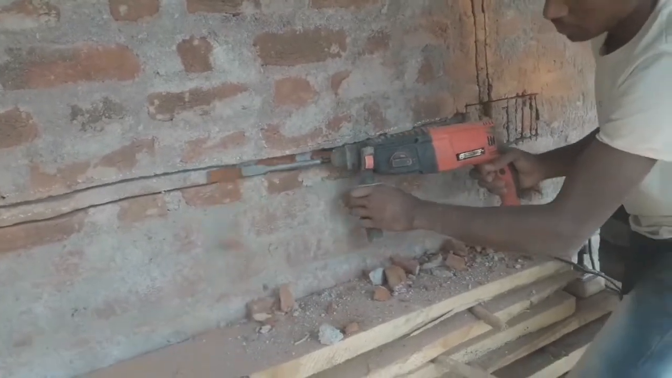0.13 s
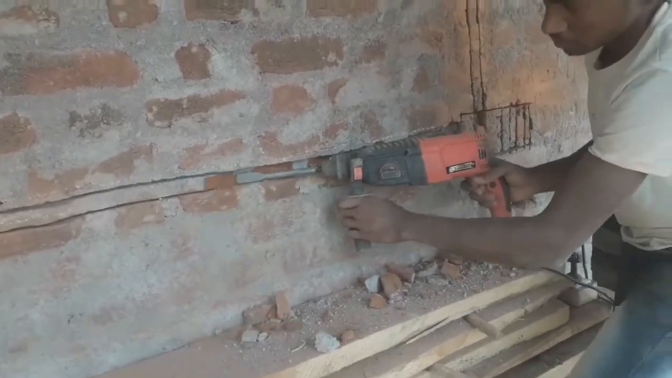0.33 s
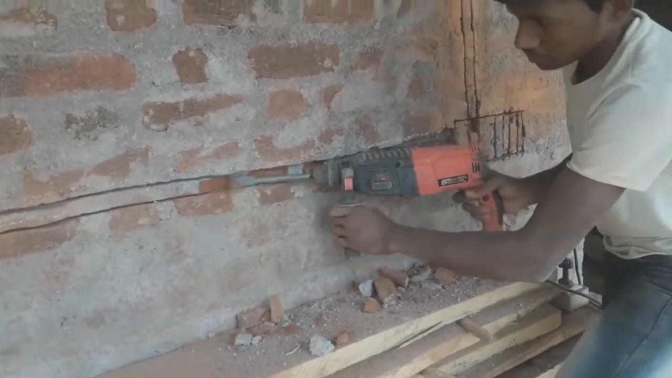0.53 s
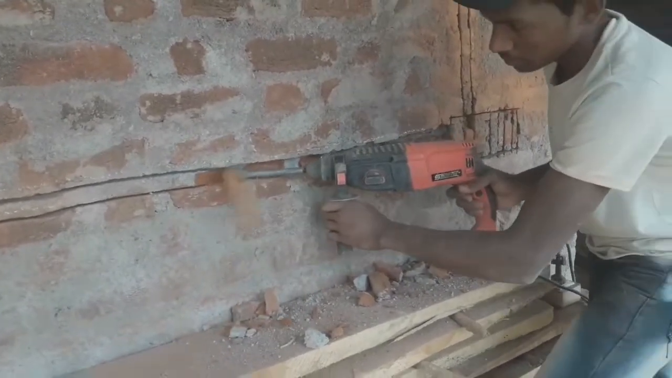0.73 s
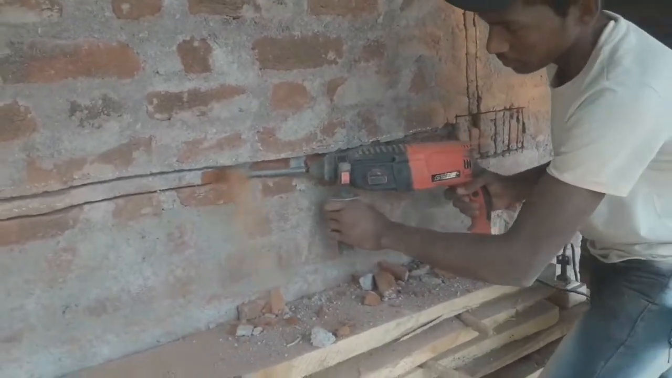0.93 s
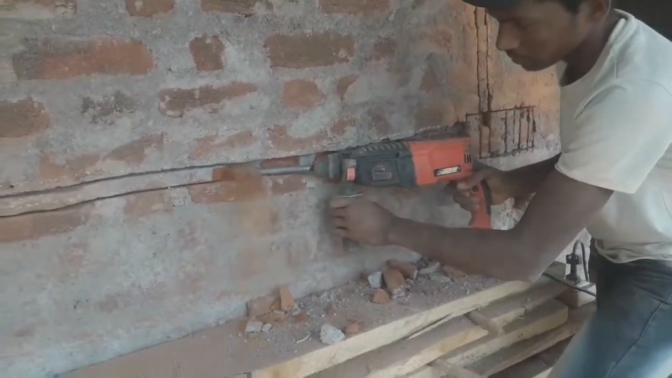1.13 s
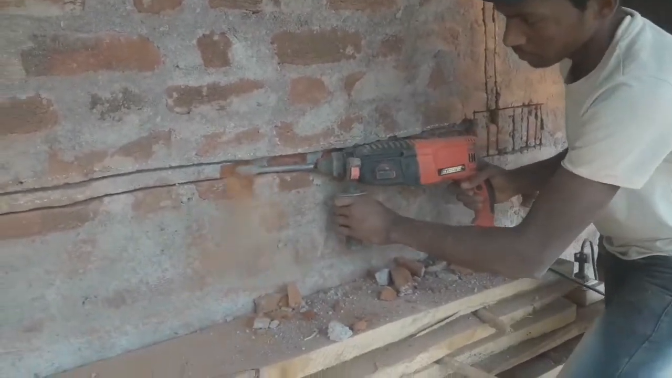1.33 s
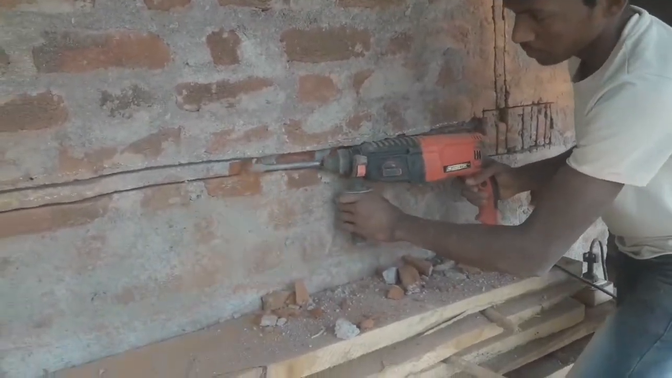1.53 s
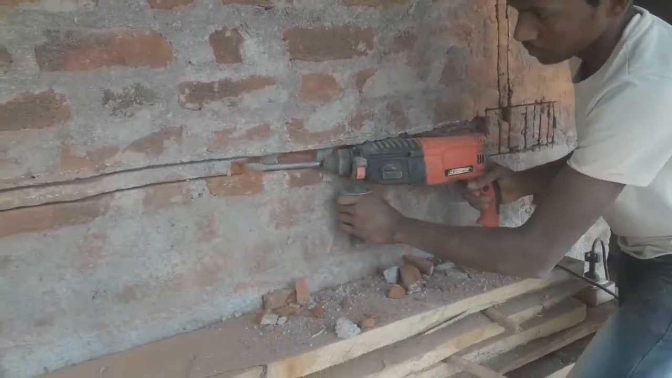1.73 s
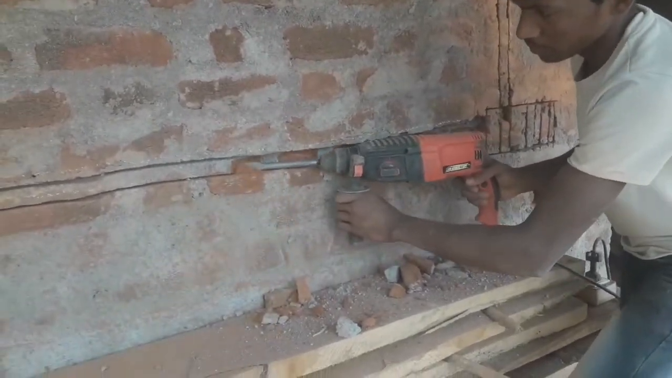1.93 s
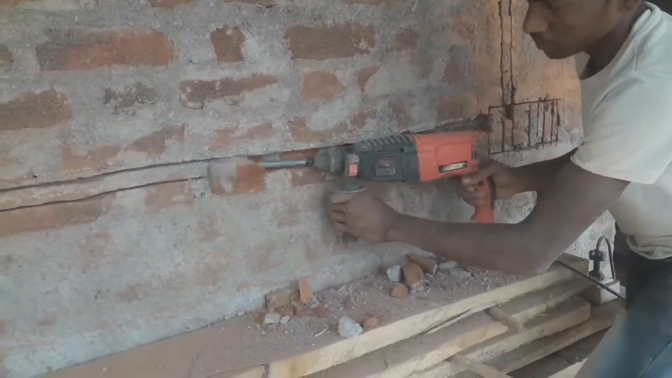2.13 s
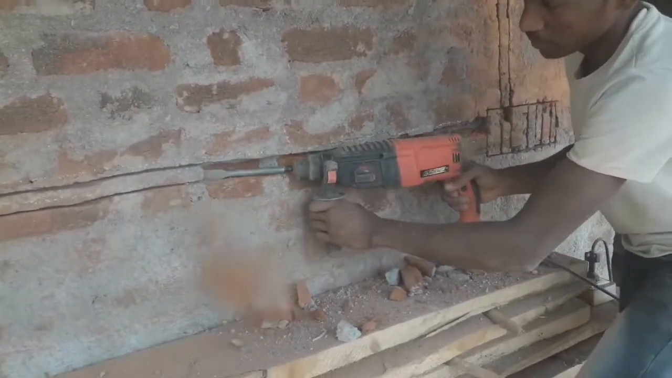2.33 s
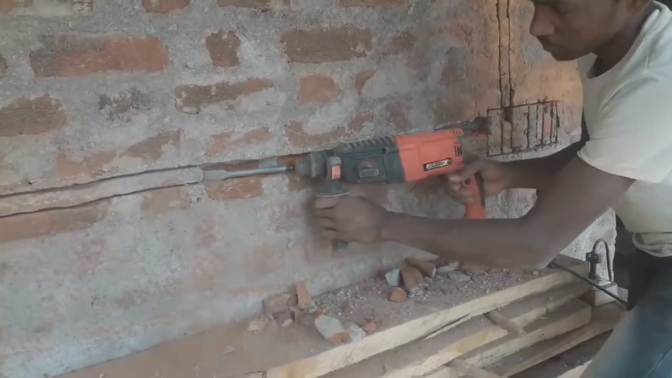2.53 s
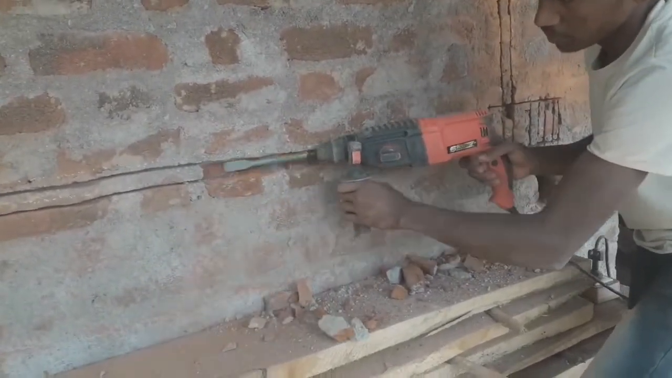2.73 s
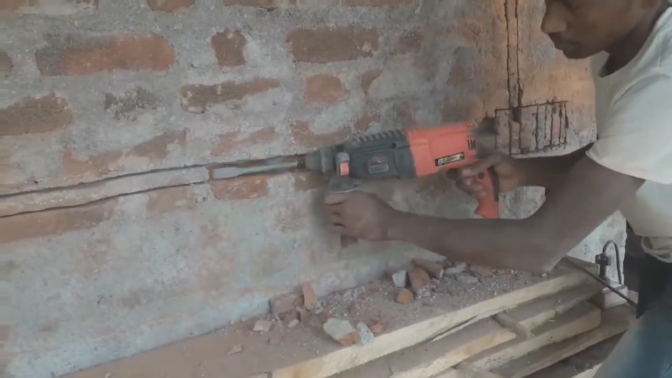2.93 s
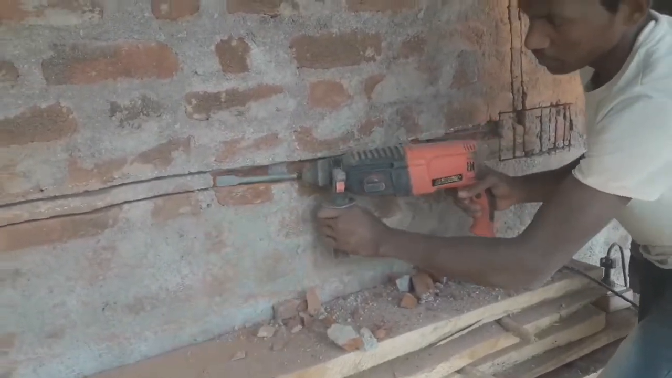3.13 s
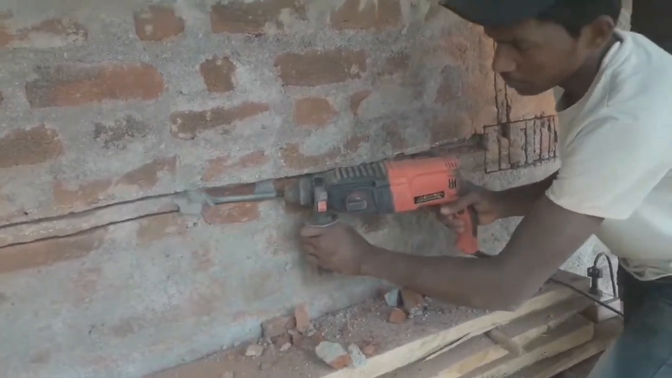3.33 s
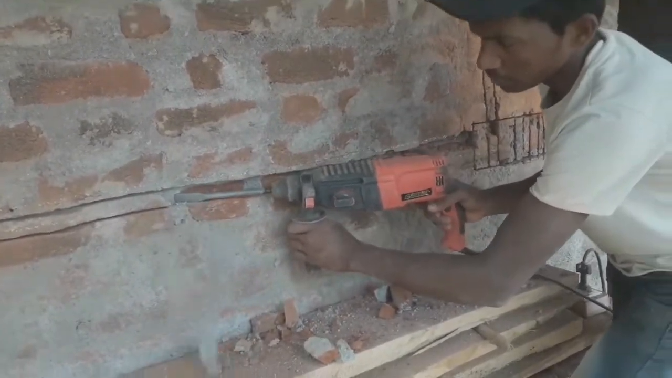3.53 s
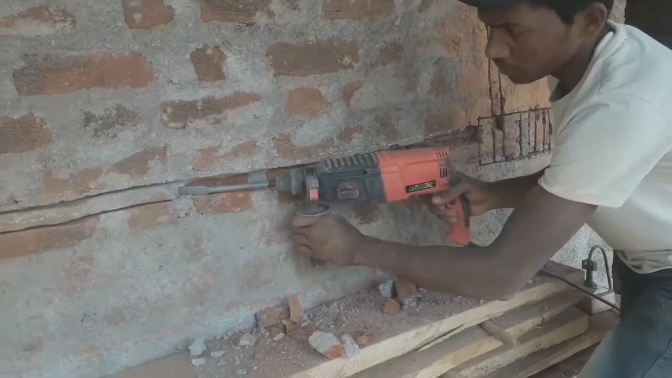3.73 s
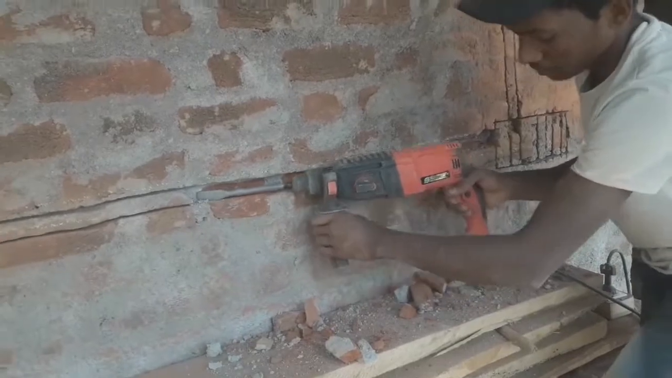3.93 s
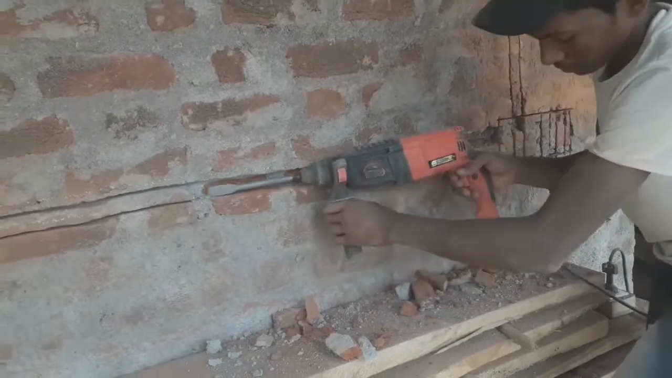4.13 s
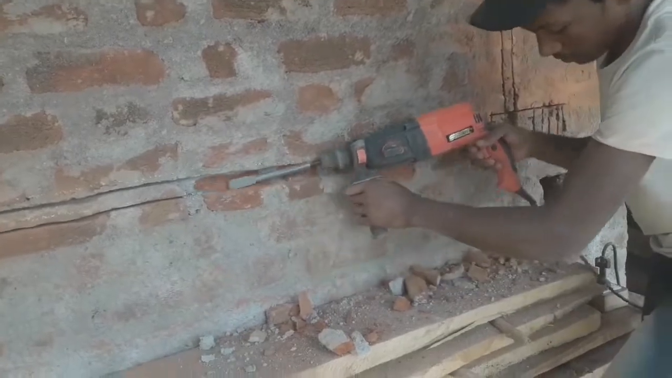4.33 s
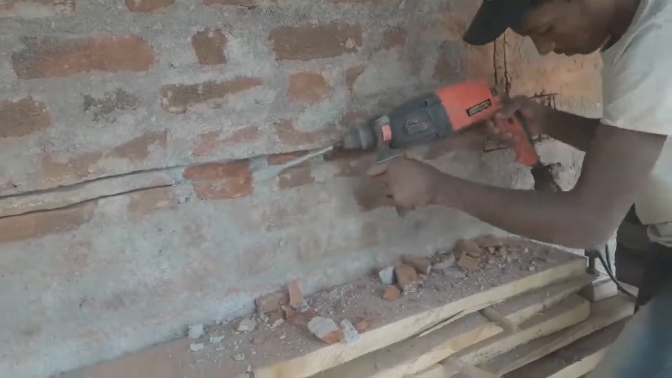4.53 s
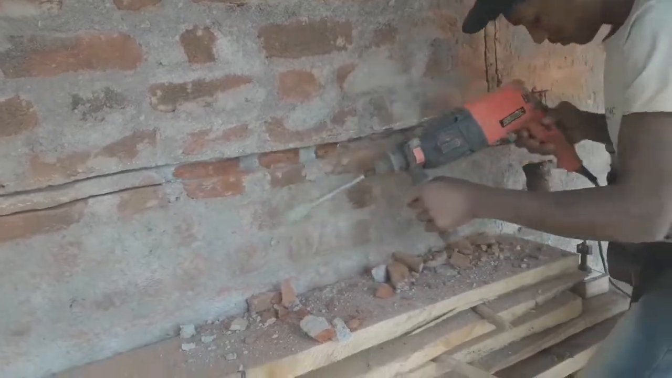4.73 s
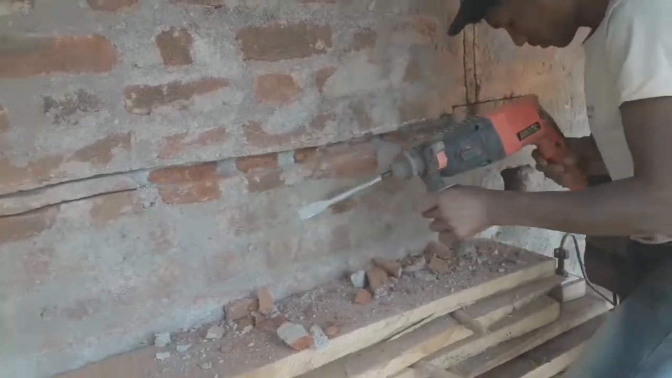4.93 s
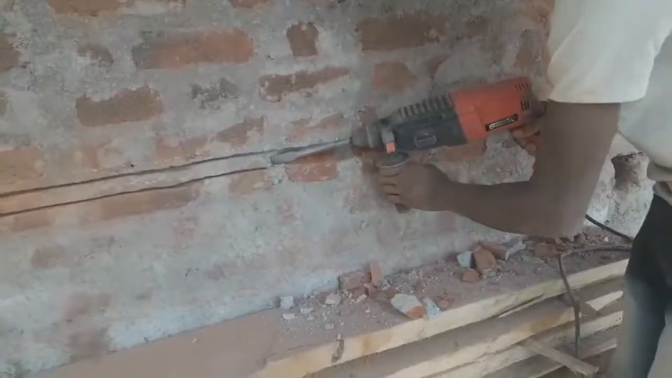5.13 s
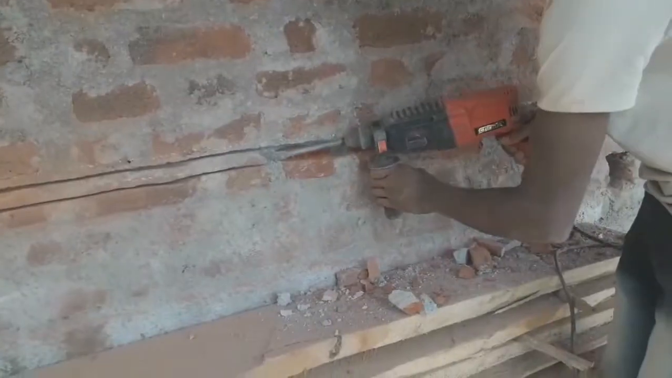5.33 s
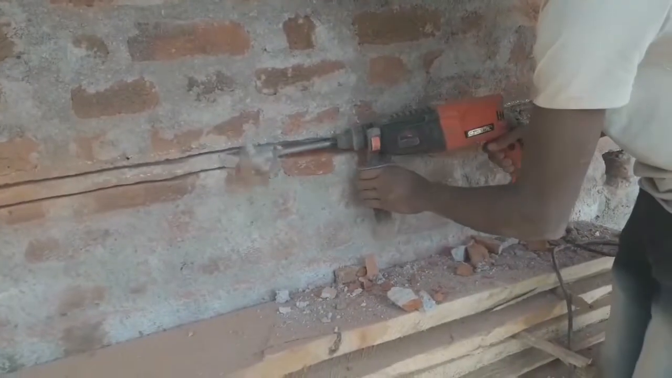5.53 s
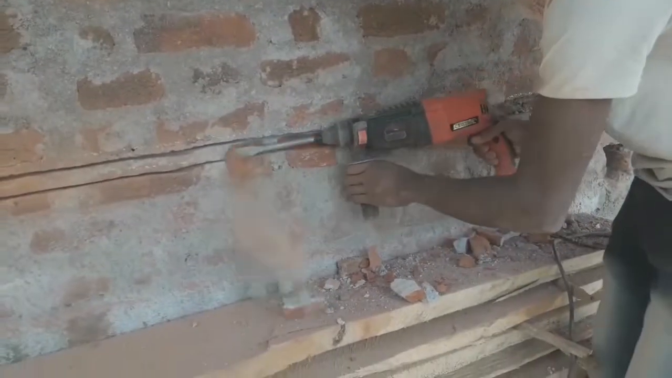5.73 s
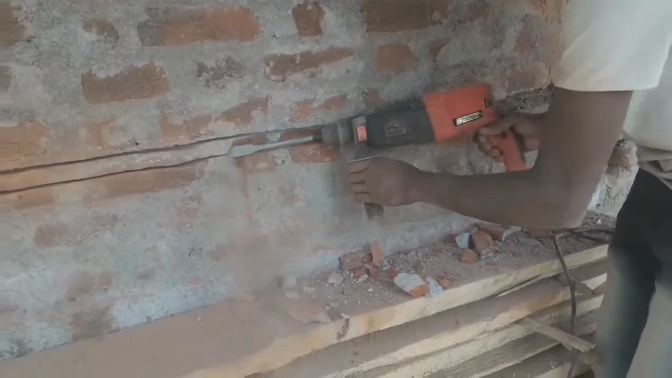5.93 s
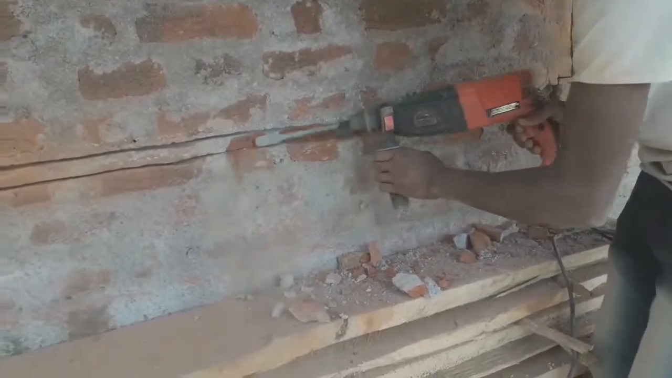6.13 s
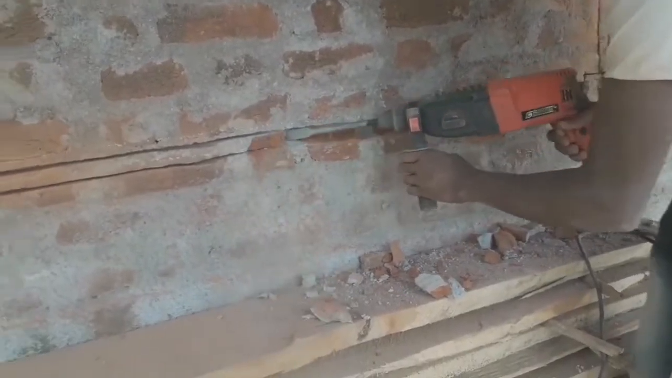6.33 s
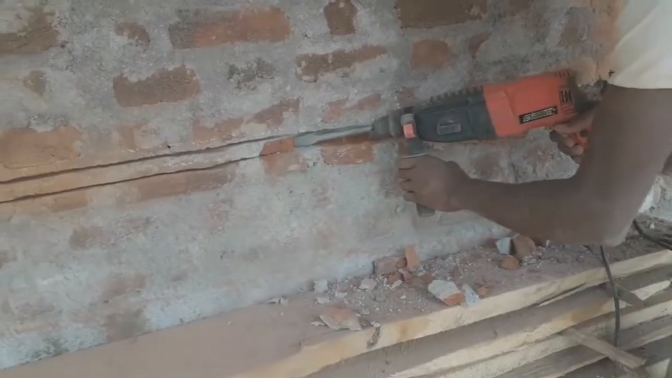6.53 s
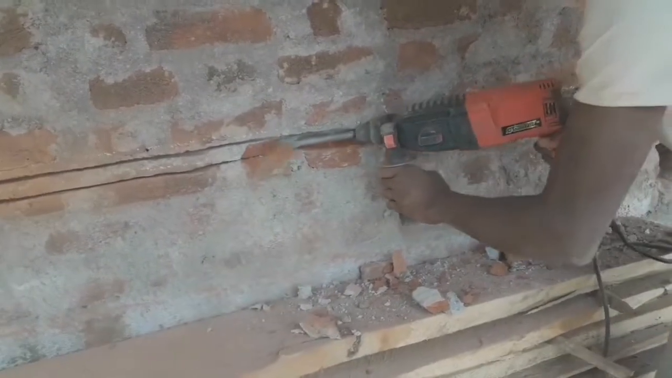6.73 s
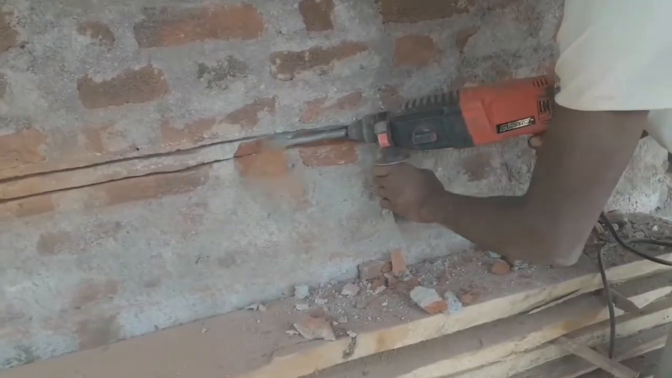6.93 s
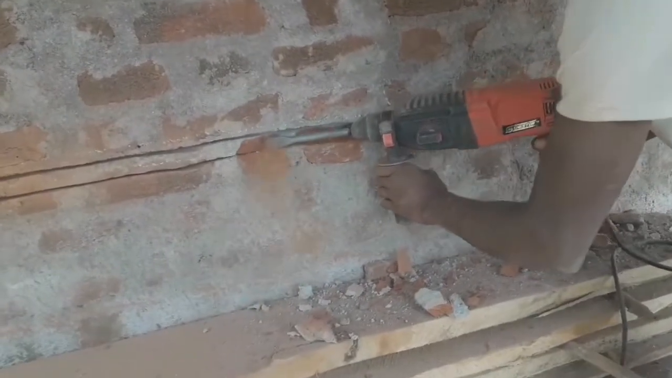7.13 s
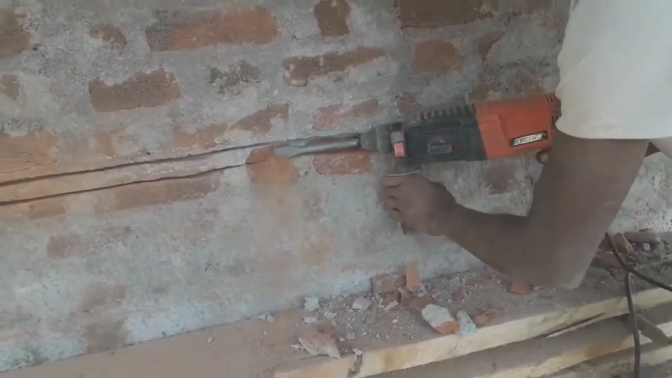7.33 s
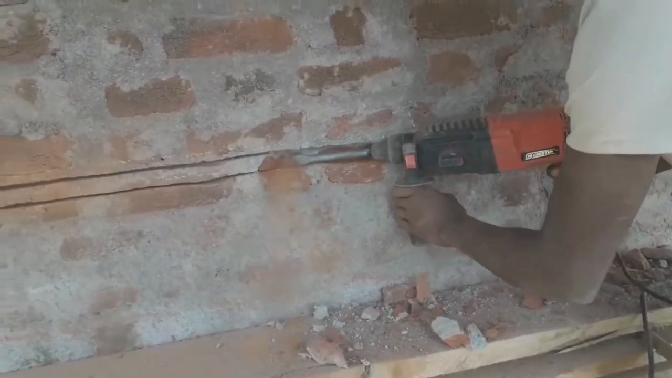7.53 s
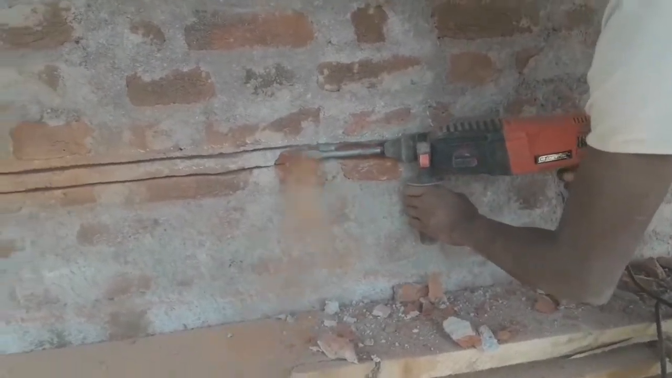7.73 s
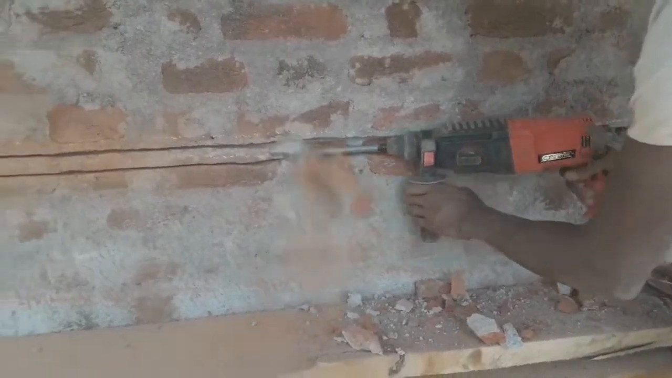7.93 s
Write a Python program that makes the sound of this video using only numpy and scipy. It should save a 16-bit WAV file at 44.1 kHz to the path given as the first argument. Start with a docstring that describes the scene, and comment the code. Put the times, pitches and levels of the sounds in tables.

```python
"""In a bare room a rotary hammer chisels a channel into a plastered brick wall.
The first of six trigger pulls is already under way and five follow: each drives the motor, then it coasts.
Each piston stroke is a noise crack with a ringing housing, a wall boom and a room tail, plus damped resonances.
A seated chisel repeats its blows closely and buzzes; a loose one rattles and sings in decaying tones.
Plaster patters down throughout as coloured pulses; the heaviest chips land in the last two pulls."""
import sys
import numpy as np
from scipy import signal
from scipy.fft import rfft, irfft, next_fast_len
from scipy.io import wavfile
from scipy.ndimage import uniform_filter1d, map_coordinates

SR = 44100
rng = np.random.default_rng(int(sys.argv[2]) if len(sys.argv) > 2 else 0)


def wrap_up_sound(samples):
    """Save the sound to the file named by the first command line argument, as 16-bit audio."""
    columns = np.atleast_2d(samples).T
    # keep every value between -1 and 1, then stretch to whole-number steps
    tamed = np.clip(columns, -1, 1)
    steps = np.round(tamed * 32767).astype(np.int16)
    wavfile.write(sys.argv[1], SR, steps)


N = 351477

WORKING_RATE = 68  # blows per second
FREE_BOOM_DB = -58  # wall boom at the working rate with the tool running free, before trims


def amp(db):
    """Decibels to gain."""
    return 10 ** (np.asarray(db) / 20)


def unit(x):
    """Scale to rms 1."""
    return x / np.sqrt(np.mean(x ** 2) + 1e-20)


def curves(rows):
    """One value per sample for each column after the time."""
    seconds, *columns = np.transpose(rows)
    return [np.interp(np.arange(N) / SR, seconds, column) for column in columns]


def convolve(x, response):
    """x heard through a response."""
    return signal.fftconvolve(x, response)[:N]


def colour(x, points):
    """Causal minimum-phase filter, its gain drawn through (Hz, dB) points."""
    size = 8192
    hz, db = np.transpose(points)
    bins_hz = np.fft.rfftfreq(size, 1 / SR)
    gain = amp(np.interp(np.log(bins_hz + 1), np.log(hz), db))
    # folding the cepstrum onto positive time makes the filter causal
    cepstrum = irfft(np.log(gain))
    cepstrum[1:size // 2] *= 2
    cepstrum[size // 2 + 1:] = 0
    return convolve(x, irfft(np.exp(rfft(cepstrum))))


def tinted(x, points):
    """Colour a white sound and keep its power."""
    impulse = signal.unit_impulse(N)
    return colour(x, points) / np.linalg.norm(colour(impulse, points))


def pulses(times, sizes):
    """Impulses that may fall between samples, as windowed sincs."""
    at = np.clip(times * SR, 0, N)[:, None]
    taps = np.floor(at).astype(int) + np.arange(-7, 9)
    shape = np.sinc(taps - at) * np.cos(np.pi * (taps - at) / 16) ** 2
    weights = sizes[:, None] * shape
    return np.bincount(np.clip(taps, 0, N).ravel(), weights.ravel(), N + 1)[:N]


def even(response):
    """A response of unit energy with its broad colour taken out and its fine peaks kept."""
    spectrum = rfft(response)
    broad_power = np.abs(uniform_filter1d(np.abs(spectrum) ** 2, size=200))
    return irfft(spectrum / np.sqrt(broad_power + 1e-12))


def resonate(blows, modes):
    """Blows through damped (Hz, width Hz, dB) resonances, wider ones dying sooner; rms 1."""
    t = np.arange(SR // 4) / SR
    response = np.zeros(len(t))
    for hz, width, db in modes:
        decay = np.exp(-np.pi * width * t)
        response += amp(db) * np.sqrt(width) * decay * np.sin(2 * np.pi * hz * t)
    return unit(convolve(pulses(*blows), response))


def motor_speed():
    """Blows per second: a pull drives the motor, fast and then settling; released, it coasts down exponentially."""
    # Each row: pressed in seconds, released in seconds, top speed in blows per second,
    # then time constants of run-up, settling and coasting in seconds.
    pulls = [(0.0, 0.105, 55.08, 0.108, 0.062, 1.028), (0.49, 2.153, 67.85, 0.062, 0.191, 1.241),
             (2.274, 2.501, 78.81, 0.09, 0.51, 1.027), (3.031, 3.928, 81.32, 0.255, 0.182, 0.971),
             (5.133, 5.9, 62.77, 0.127, 0.134, 0.794), (6.514, 7.879, 68.19, 0.065, 0.446, 1.25)]
    settling_share = .12
    now = np.arange(N) / SR
    speed = np.full(N, float(pulls[0][2]))  # already at speed
    for pressed, released, top, run_up, settling, coasting in pulls:
        held = np.clip(now, pressed, released) - pressed
        fast = (1 - settling_share) * np.exp(-held / run_up)
        short = fast + settling_share * np.exp(-held / settling)
        driven = top - (top - np.interp(pressed, now, speed)) * short
        coast = np.exp(-np.maximum(now - released, 0) / coasting)
        speed = np.where(now < pressed, speed, driven * coast)
    return speed


def sway(per_s):
    """A smooth random curve for the unsteady grip, per_s random points a second."""
    points = rng.standard_normal(int(N * per_s / SR) + 4)
    return map_coordinates(points, [np.arange(N) * per_s / SR], order=2)


def blow_levels(speed):
    """dB of housing, steel, edge and boom: blows grow with speed, and change while the chisel meets the wall."""
    # Each row: start in seconds, length in seconds, change of housing, steel, edge and boom in dB.
    contact_spells = [(-.1, .14, 5.5, 6, 15, 10), (0.492, 0.31, 3, 3, 18, 10), (0.797, 1.53, 3, 4, 17.5, 4),
                      (2.818, 0.14, -0.5, 0, 9, -5), (3.244, 0.14, -1, -2, 16, 7.5),
                      (5.169, 0.38, 8, 7.5, 20.5, 14), (5.548, 0.35, 5, 6, 24, 9.5),
                      (5.908, 0.19, 4.5, 5, 20, 5), (6.635, 0.51, 4.2, 5, 20.5, 11),
                      (7.142, 1.2, 4.5, 6.5, 22.5, 19)]
    # housing, steel, edge, boom running free: dB at the working rate, dB per doubling of speed
    free = [(-42, 9.65), (-40.5, 12.9), (-60, 11), (FREE_BOOM_DB, 7.8)]
    lean_s = 0.035  # time to lean in or ease off
    sway_db = (.4, .5, 1.3, 1.5)  # housing, steel, edge, boom
    now = np.arange(N) / SR

    def lean(s):
        return np.clip((now - s) / lean_s + .5, 0, 1)

    doublings = np.log2(speed / WORKING_RATE)
    levels = np.array([db + slope * doublings for db, slope in free])
    for start, length, *gains_db in contact_spells:
        levels += np.outer(gains_db, lean(start) - lean(start + length))
    return levels + np.outer(sway_db, sway(per_s=14))


def motor(speed, seat):
    """The cooling fan, coloured noise, rushes with the speed; the gears whine as a sine under load."""
    # Air noise of the fan. Each row: frequency in Hz, relative level in dB.
    fan = [(24, -37), (40, -26), (449, -18), (522, -9), (704, -9.5), (1450, -1.5), (2110, 6.5),
           (2770, -11.5), (4130, 2.5), (6480, -2), (8310, -21), (10400, -11), (15500, -27)]
    # Gear whine with the chisel fully seated. Each row: time in seconds, level in dB.
    whine_levels = [(.6, -57), (1.0, -44), (1.6, -41.5), (2.1, -44), (2.3, -57), (6.8, -52), (7.4, -48)]
    air = unit(colour(rng.standard_normal(N), fan)) * amp(-51.0) * speed / WORKING_RATE
    teeth = 25  # whine cycles per blow
    whine = np.sin(2 * np.pi * teeth * np.cumsum(speed) / SR)
    return air + whine * amp(curves(whine_levels)[0]) * seat


def showers():
    """(s, dB) of the chips in the showers of loosened plaster, unevenly spaced and sized."""
    # Each row: start in seconds, length in seconds, chips per second, middle level in dB before the landing gain.
    spells = [(.6, 1.1, 14, -53.5), (1.799, 0.19, 15.6, -45), (2.3, 0.29, 14, -54),
              (2.789, 0.14, 60, -43.5), (3.04, .38, 16, -47.5), (7.15, 1.1, 20.3, -43)]
    scatter_db = 3  # either way
    landings = []
    for start, length, rate, db in spells:
        slots = np.arange(0, length, 1 / rate)
        late, size = rng.random((len(slots), 2)).T
        landings += zip(start + slots + late / rate, db + scatter_db * (2 * size - 1))
    return landings


def chips(bite_db):
    """Chips of plaster land with a dull push and crumble briefly; small ones patter while the edge bites."""
    # Big chips landing. Each row: time in seconds, level in dB before the landing gain.
    big_chips = [(0.038, -47), (0.56, -50), (0.777, -43.5), (2.39, -48), (2.86, -40), (3.31, -44),
                 (5.569, -26.5), (7.225, -41), (7.343, -30), (7.433, -37), (7.522, -41), (7.625, -29.5),
                 (7.669, -32)]
    # Dull colour of a landing. Each row: frequency in Hz, gain in dB.
    thump = [(25, -30), (70, 0), (130, 4.5), (250, 0), (500, -10), (1200, -29), (4000, -60)]
    # Knock of a landing chip. Each row: frequency in Hz, gain in dB.
    knock = [(100, -26), (300, -6), (600, 0), (1000, -21), (2500, -20), (8000, -40)]
    knock_db, knock_grows = 38, 1.19  # gain in dB, and dB of knock per dB of landing
    out, t = np.zeros(N + SR), np.arange(SR // 8) / SR
    when, size = rng.random((160, 2)).T
    fall = np.minimum(bite_db[(when * N).astype(int)], -46)
    patter = pulses(when * N / SR, amp(fall + 21.5 + 13.6 * size))
    landings = list(big_chips) + showers()
    for s, db in landings:
        crumble = 0.045 * amp(-60 * t / 0.11) * rng.standard_normal(len(t))
        push = signal.unit_impulse(len(t))
        out[round(s * SR):][:len(t)] += amp(db + 36.5) * (crumble - push)
    # the harder a chip lands, the brighter it sounds: the knock grows faster than the push
    s, db = np.transpose(landings)
    knocks = colour(pulses(s, amp(knock_grows * db + knock_db)), knock)
    return colour(out[:N] - patter, thump) - knocks


def hum(speed, orders):
    """The body shakes at multiples of the blow rate, each wavering a little; rms 1."""
    turns = np.cumsum(speed) / SR
    knots = np.arange(0, N + SR, SR // 6)
    total = np.zeros(N)
    for multiple, db in orders:
        waver = np.interp(np.arange(N), knots, rng.standard_normal(len(knots)))
        phase = 2 * np.pi * (multiple * turns + rng.random())
        total += amp(db + 1.5 * waver) * np.sin(phase)
    return unit(total)


def body_hum(speed, seat, housing_db):
    """Each way of holding the tool against the wall favours its own harmonics."""
    # Braced in the wall, first grip. Each row: multiple of the blow rate, relative level in dB.
    first_grip = [(1, -33), (2, -12), (3, -5), (4, -4), (5, -28), (6, -6), (7, -3), (8, 1.5), (9, 4.5),
                  (10, -1), (11, 2.5), (12, -20), (13, -30), (14, 6), (15, -1.5), (16, -9), (17, 9),
                  (18, 5.5), (19, 4.5), (20, -23), (21, -22), (22, 5.5), (23, -22), (24, 1)]
    # Braced in the wall, last grip. Each row: multiple of the blow rate, relative level in dB.
    last_grip = [(1, -22), (2, -10), (3, -9), (4, 1), (5, -6), (6, -20), (7, 8), (8, -19), (9, -0.5),
                 (10, 7.5), (11, -9), (12, 6.5), (13, -36), (14, 3), (15, 4), (16, 5), (17, -2), (18, 7),
                 (19, 4.5), (20, -13), (21, 6), (22, -18), (23, 6), (24, 8.5)]
    # Running free. Each row: multiple of the blow rate, relative level in dB.
    free_run = [(1, -43), (2, -33), (3, -22), (4, -23), (5, -4), (6, -25), (7, -7), (8, 4.5), (9, -24),
                (10, 4.5), (11, -10), (12, -11), (13, 5), (14, -6), (15, 4), (16, 2)]
    now = np.arange(N) / SR
    first = np.interp(now, [2.1, 2.25], [1, 0])
    last = np.interp(now, [5.0, 5.2], [0, 1])
    grips = first * amp(-4.5) * hum(speed, first_grip) + last * amp(-3.5) * hum(speed, last_grip)
    free = (1 - first - last) * amp(2.0) * hum(speed, free_run)
    braced = np.interp(seat, [.22, .5, 1], [0, .5, 1])
    return (grips + free) * braced * amp(housing_db)


def singing_chisel(speed):
    """Bouncing clear of the brick, the chisel rings in its free modes with a light tick, once a stroke."""
    # Free modes of the chisel. Each row: centre frequency in Hz, middle level in dB, 60 dB decay in seconds.
    free_modes = [(10740, -5, 0.04), (12050, -7, .04), (14700, -14, 0.15), (14320, 10, 0.037),
                  (15450, -15, .03)]
    # Spells of bouncing. Each row: start in seconds, length in seconds, level in dB before trim and scatter.
    bounces = [(0.013, .005, -45), (.5038, .005, -50), (2.139, .15, -39.5), (2.866, .03, -48),
               (3.275, .05, -46), (5.223, .08, -34.5), (5.551, .35, -39), (6.3535, .04, -51),
               (6.5, .005, -41), (6.627, .005, -41), (7.895, .005, -27)]
    scatter_db = 5  # standard deviation from stroke to stroke
    out, t = np.zeros(N + SR), np.arange(SR // 6) / SR
    for start, length, db in bounces:
        stroke_s = 1 / speed[round(start * SR)]
        for s in start + np.arange(0, length, stroke_s):
            tone = np.zeros(len(t))
            for hz, level, t60 in free_modes:
                decay = amp(level + rng.normal(0, 1.0) - 60 * t / t60)
                tone += decay * np.sin(2 * np.pi * (hz + rng.normal(0, 25)) * t)
            tick = .18 * amp(-60 * t / .012) * rng.standard_normal(len(t))
            gain = amp(db - 2.5 + rng.normal(0, scatter_db))
            out[round(s * SR):][:len(t)] += gain * (tone + tick)
    return out[:N]


def strokes(speed, seat, loose_jitter, scatter_db):
    """One blow per piston stroke, near unit power; a loose chisel is struck less evenly (jitter in s)."""
    turns = np.cumsum(speed) / SR
    times = np.interp(np.arange(0, turns[-1]), turns, np.arange(N) / SR)
    at = (times * SR).astype(int)
    time_luck, size_luck = rng.standard_normal((len(times), 2)).T
    slack = 1 - seat[at]
    sizes = amp(scatter_db * np.sqrt(slack) * size_luck) * np.sqrt(SR / speed[at])
    return times + loose_jitter * slack ** 2 * time_luck, sizes


def rattle(blows, seat, share, rebound):
    """A loose chisel bounces on the striker: each blow shares its power with two later contacts (rebound in s)."""
    times, sizes = blows
    at = np.clip(times * SR, 0, N - 1).astype(int)
    bounce = np.clip(share * (1 - seat[at]), 0, .9)
    first_gap, second_gap = rebound * amp(2.74 * bounce * rng.standard_normal((len(times), 2)).T)
    contacts = np.r_[times, times + first_gap, times + first_gap + second_gap]
    shares = np.r_[np.sqrt(1 - bounce), np.sqrt(bounce * 2 / 3), np.sqrt(bounce / 3)]
    return contacts, np.tile(sizes, 3) * shares


def ring(blows, level_db, seat, crack, body_t60, body_db, room_t60, room_db):
    """Each blow is a crack, a short dense ring and a room tail: partly repeated from blow to blow, partly new."""
    times, sizes = blows
    now, t = np.arange(N) / SR, np.arange(SR // 4) / SR
    sizes = sizes * amp(np.interp(times, now, level_db))
    # power over time after one blow; crack and decay times in seconds, dB against the crack
    swell = 1 - np.exp(-t / crack)
    power = unit(t * np.exp(-t / crack)) ** 2
    power += unit(swell * amp(-60 * t / body_t60)) ** 2 * amp(body_db) ** 2
    power += unit(swell * amp(-60 * t / room_t60)) ** 2 * amp(room_db) ** 2
    power /= power.sum()
    energy = np.bincount(np.clip(times * SR, 0, N).astype(int), sizes ** 2, N + 1)[:N]
    fresh = np.sqrt(np.abs(convolve(energy, power))) * rng.standard_normal(N)
    # the repeated response drifts as the chisel advances along the channel
    train, repeated = pulses(times, sizes), np.zeros(N)
    for place in np.arange(0, now[-1] + .5, .5):
        near = np.cos(np.pi * np.clip(now - place, -.5, .5))
        response = even(np.sqrt(power) * rng.standard_normal(len(t)))
        repeated += convolve(train * near, response)
    alike = np.clip(seat, 0, 1)
    return np.sqrt(alike) * repeated + np.sqrt(1 - alike) * fresh


def hammer(speed, seat, housing_db, steel_db, bite_db, boom_db):
    """The blows sound in the housing, the chisel steel, its edge and the wall."""
    # Housing colour. Each row: frequency in Hz, relative level in dB.
    housing_colour = [(150, -43.5), (350, -20.5), (600, -6), (1100, 0.5), (1600, -2.5), (2200, -0.5),
                      (2650, -11.5), (3300, -30.5), (5000, -53)]
    # Chisel steel colour. Each row: frequency in Hz, relative level in dB.
    steel_colour = [(1800, -35), (2800, -11.5), (3300, -6), (3900, 1.5), (4900, 1.5), (5700, -2.5),
                    (7000, -3), (7600, -14), (8400, -23), (11500, -17.5), (15500, -24)]
    # Colour of the biting edge. Each row: frequency in Hz, relative level in dB.
    edge_colour = [(6000, -36), (8500, -13), (11000, -5.5), (12700, -4), (13600, 7.5), (14400, 9),
                   (15400, -3), (16200, -59)]
    # Colour of the wall's boom. Each row: frequency in Hz, relative level in dB.
    wall_colour = [(60, -21), (130, -7), (200, -5.5), (270, -9), (340, 1), (410, -3), (480, -3), (700, 1),
                   (1200, -33.5), (3000, -19)]
    # Deep thud of a blow in the wall. Each row: frequency in Hz, relative level in dB.
    thud_colour = [(25, 1), (45, -9), (68, 4.5), (135, 8), (205, 1), (340, 4), (600, -21), (1500, -39)]
    # Slack shank in its chuck. Each row: frequency in Hz, width in Hz, relative level in dB.
    shank = [(4300, 44, 7), (4740, 76, 8.5), (5120, 140, 5), (5900, 89, 2.5)]
    # the thud grows faster than the boom
    thud_db = -76.5 + 1.32 * (boom_db - FREE_BOOM_DB)
    blows = strokes(speed, seat, loose_jitter=.00015, scatter_db=1)
    contacts = rattle(blows, seat, share=0.655, rebound=.0022)
    housing = ring(contacts, housing_db - .5 - 1.17 * seat, 0.81 * seat, crack=0.00042,
                   body_t60=0.078, body_db=-22, room_t60=0.21, room_db=3.5)
    # a biting chisel makes the brick ring on; an idle one clacks with gaps between
    idle = np.interp(bite_db, [-62, -48], [.85, 0])
    pressed = np.sqrt(1 - idle) * ring(blows, steel_db, 0.45 * seat, crack=0.00039,
                                       body_t60=0.3, body_db=-29, room_t60=0.15, room_db=4)
    slack = np.sqrt(idle) * ring(contacts, steel_db - 2.0, .5 * seat, crack=0.00015,
                                 body_t60=0.05, body_db=-2, room_t60=0.19, room_db=-1)
    clack = resonate(contacts, shank) * idle * amp(steel_db - 4)
    # pressed home, the casing drones; left slack, the chisel clanks in its bending mode
    drone = resonate(blows, [(338, 14, 0), (950, 18, 1)]) * seat ** 2 * amp(housing_db - 12)
    clank = resonate(contacts, [(2095, 29, 0)]) * (1 - seat) * amp(housing_db - 9.0)
    edge = ring(contacts, bite_db, seat, crack=0.0003,
                body_t60=.034, body_db=-11, room_t60=0.1, room_db=-10.5)
    wall = ring(blows, boom_db - 0.5 - 5 * seat, 0.92 * seat, crack=0.00056,
                body_t60=0.024, body_db=-8.5, room_t60=0.38, room_db=-3)
    thud = tinted(pulses(*blows), thud_colour) * amp(thud_db) * (1 - idle)
    tool = tinted(housing, housing_colour) + tinted(pressed + slack, steel_colour)
    bite = tinted(edge, edge_colour) + tinted(wall, wall_colour) - thud
    return tool + bite + clack + clank + drone


def scene():
    """Hammer, motor and debris in one channel."""
    # How firmly the chisel sits. Each row: time in seconds, seating from 0 (loose) to 1 (firm).
    seating = [(0, 0.37), (.5, 0.3), (.68, 0.64), (2.1, 0.78), (2.18, 0.34), (3.3, 0.08), (3.6, 0.41),
               (3.95, 0.43), (4.3, 0.28), (5.2, 0.26), (5.5, 0.41), (6.0, 0.35), (6.6, 0.23), (6.75, 0.79),
               (7.82, 0.75), (7.97, 0.13)]
    speed = motor_speed()
    seat = np.clip(curves(seating)[0], .02, .97)
    housing_db, steel_db, bite_db, boom_db = blow_levels(speed)
    tool = hammer(speed, seat, housing_db, steel_db, bite_db, boom_db)
    tool += body_hum(speed, seat, housing_db) + motor(speed, seat)
    return (tool + singing_chisel(speed) + chips(bite_db))[None]


def record(dry):
    """The microphone track keeps nothing above its band limit."""
    top_hz = 15700
    size = next_fast_len(N + SR // 4)
    kept = np.fft.rfftfreq(size, 1 / SR) < top_hz
    return irfft(rfft(dry, size) * kept, size)[:, :N]


dry = scene()
out = record(dry)
wrap_up_sound(out)
```